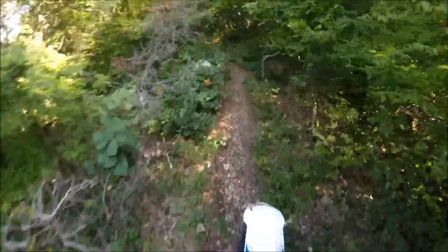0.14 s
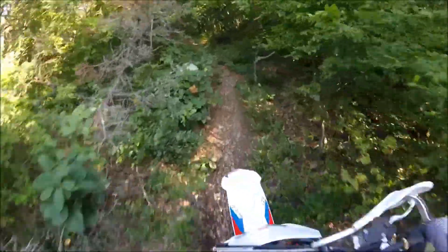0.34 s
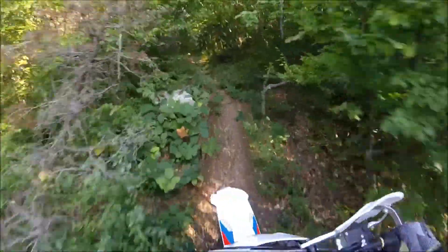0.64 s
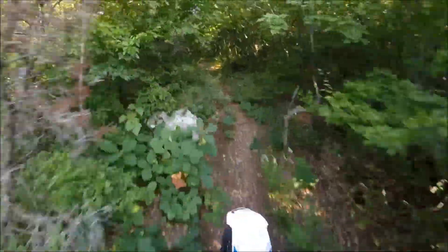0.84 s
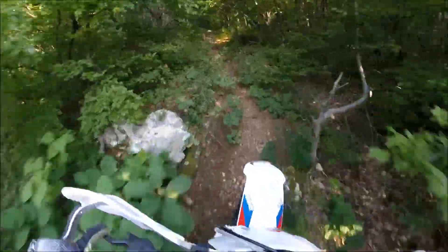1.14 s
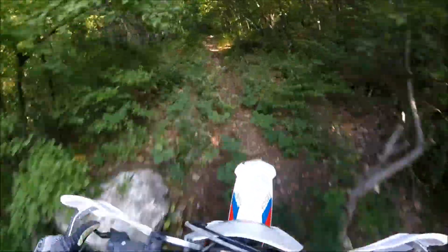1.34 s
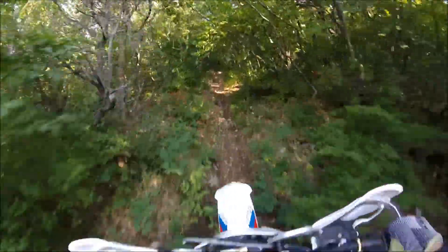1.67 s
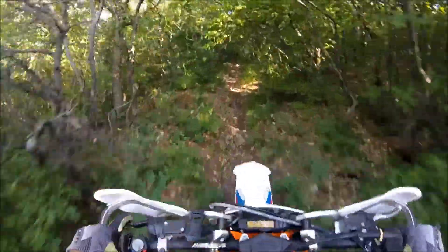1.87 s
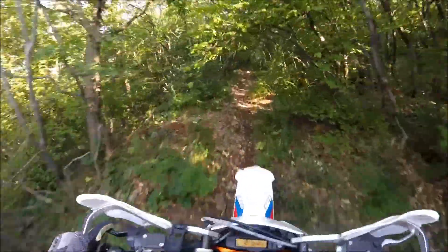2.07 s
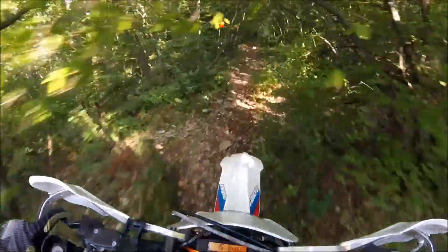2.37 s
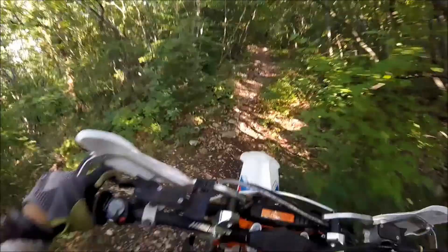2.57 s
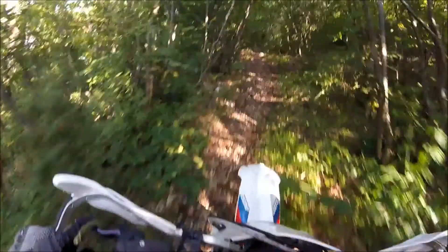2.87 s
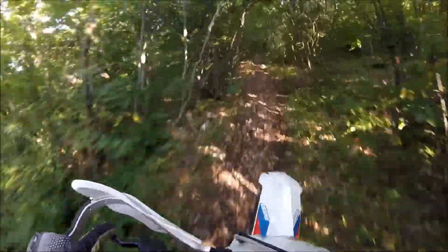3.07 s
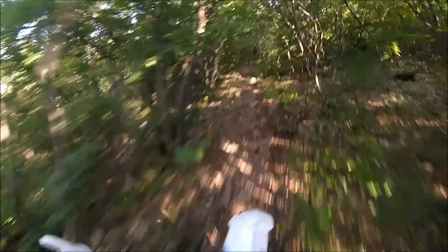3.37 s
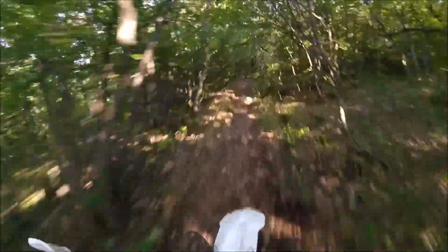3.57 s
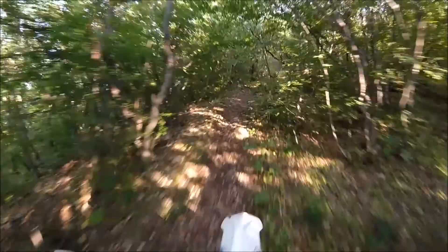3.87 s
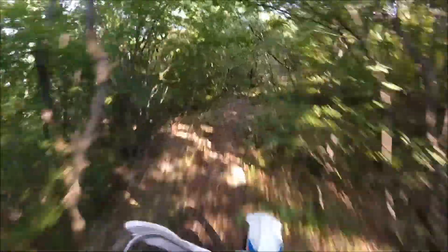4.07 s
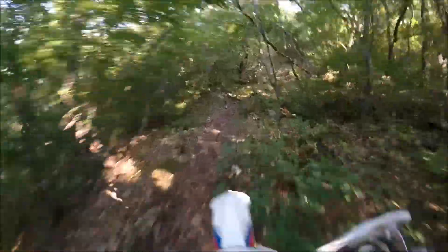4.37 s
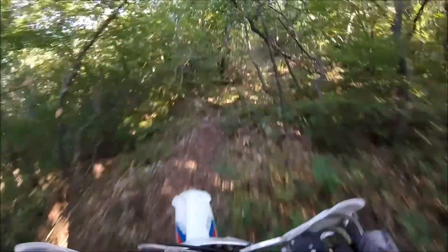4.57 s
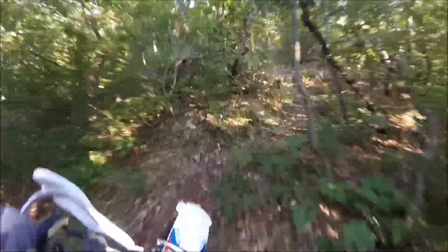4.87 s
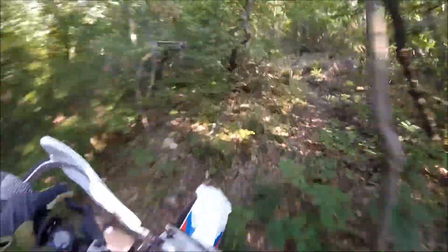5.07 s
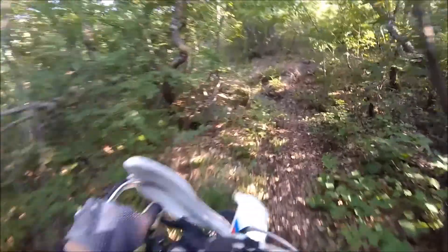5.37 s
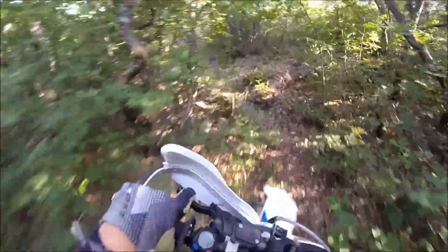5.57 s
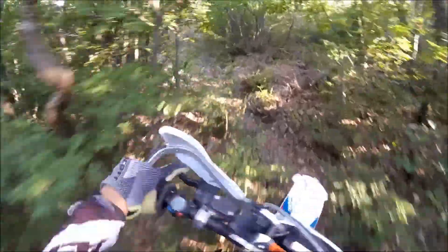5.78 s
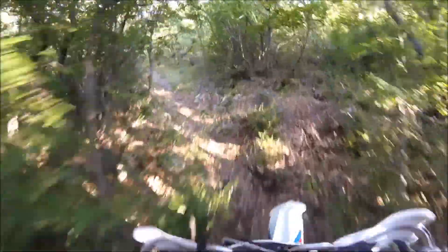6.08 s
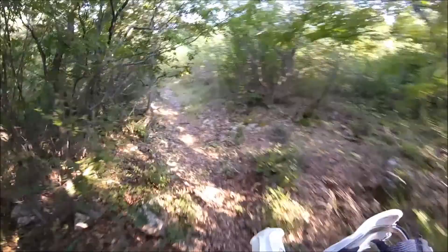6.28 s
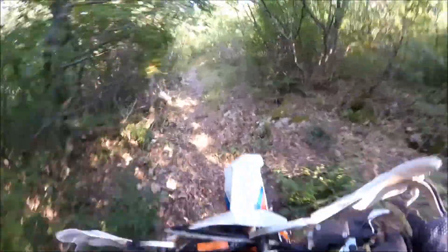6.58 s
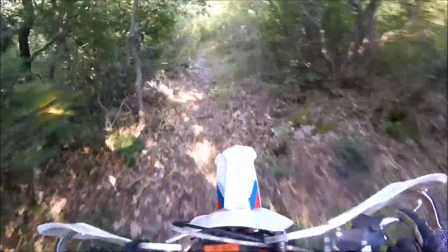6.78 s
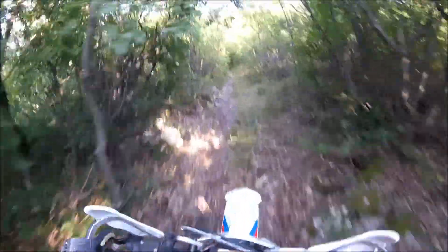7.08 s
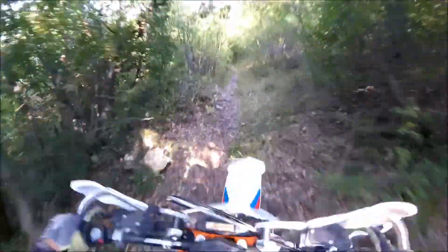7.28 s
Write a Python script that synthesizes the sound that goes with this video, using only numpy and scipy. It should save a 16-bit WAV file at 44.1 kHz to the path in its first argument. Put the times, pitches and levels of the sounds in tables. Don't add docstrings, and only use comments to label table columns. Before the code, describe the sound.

A two-stroke dirt bike buzzes along a forest trail, revving in bursts with throttle cuts and bangs, while twigs snap against the helmet.

```python
import sys
import numpy as np
from scipy import signal
from scipy.fft import rfft, irfft, next_fast_len
from scipy.io import wavfile
from scipy.ndimage import uniform_filter1d

SR = 44100
rng = np.random.default_rng(int(sys.argv[2]) if len(sys.argv) > 2 else 0)


def to_wav(sig):
    pcm = np.clip(np.atleast_2d(sig), -1, 1) * 32767
    pcm = np.round(pcm).astype(np.int16)
    wavfile.write(sys.argv[1], SR, pcm.T)


def makeup_ratio(level_db):
    decades = np.asarray(level_db, float) / 20
    return 10 ** decades


N = 327222
T = np.arange(N) / SR

# start_s, level_db
WIND_LEVEL = [(0.0, -28), (1.18, -31), (1.34, -55), (3.08, -48), (3.43, -52), (3.89, -36.5), (4.63, -41),
              (5.25, -32), (6.2, -40), (6.38, -29.5), (7.42, -30.5)]
# start_s, peak_db, pitch_hz
LOW_THUMPS = [
    (4.564, -10, 63),
    (4.826, -18, 29.7),
    (5.258, -12.5, 27.97),
]
# start_s, peak_db, length_s, ring_hz, thud_db
TWIG_HITS = [(1.111, -16, 0.013, 7100, -12), (1.135, -20, 0.029, 6500, -31), (2.004, -24, 0.016, 5900, -26),
             (2.6026, -25.5, 0.033, 5400, -22), (2.609, -10.5, 0.0087, 6600, -8),
             (2.66, -14, 0.013, 5070, -17), (2.678, -15, 0.0055, 5400, -26),
             (2.7022, -15, 0.005, 5590, -15.5), (2.714, -29, 0.0065, 5200, -16),
             (2.7485, -13, 0.0024, 2520, -40), (4.527, -7.5, 0.015, 5320, -17),
             (4.543, -29, 0.0044, 5040, -9), (4.55, -35, 0.028, 6500, -20),
             (4.562, -23.5, 0.012, 5370, -11), (4.57, -9.5, 0.0024, 2055, -22)]
# pitch_hz, level_db (per Hz)
TWIG_TONE = [(350, -29), (600, -5), (861, -24.5), (1060, -5.5), (1150, -7), (1640, -11.5), (2270, -5),
             (3140, -16.5), (5770, -16.5), (9030, -23), (11700, -56), (15200, -85), (22000, -120)]

# time_s, turns_per_s
GRIP_SPEED = [(0.0, 50), (.47, 42), (1.1, 47.8), (1.21, 54.3), (1.43, 55.8), (1.67, 72.6), (1.82, 77.4),
              (2.12, 52.2), (2.43, 55.0), (2.64, 64), (3.33, 75.2), (3.84, 68), (4.36, 59), (5.0, 45),
              (5.65, 40), (6.4, 41.5), (7.23, 34.2), (7.42, 41.7)]
# peak_s, extra_turns_per_s, rise_s, fall_s
WHEEL_FLARES = [(.16, 22, 0.14, .08), (.33, 16, .15, 0.13), (0.977, 16.5, 0.081, 0.061),
                (1.51, 3.5, 0.057, 0.077), (1.641, 2.0, 0.049, .1), (2.03, 8.5, 0.067, 0.088),
                (2.49, 3.5, 0.051, .13), (2.73, -8, 0.044, 0.044), (2.81, 13, 0.03, 0.064),
                (2.889, -7.5, 0.034, 0.073), (2.999, 6, 0.068, 0.055), (3.148, 10, 0.084, .18),
                (3.48, 54, .135, 0.12), (3.63, 50, .14, 0.24), (3.97, 29, .12, 0.19),
                (5.4, 5.5, 0.41, 0.22), (5.881, 3, .18, .2), (6.22, 1.0, 0.11, 0.096),
                (6.68, 6.5, 0.23, .08), (6.945, 8.5, .14, 0.14)]
# open_s, shut_s, opening_pipe_db, shutting_pipe_db
THROTTLE_TWISTS = [(0.0, 0.078, -17, -26), (0.112, 0.152, -12, -9.5), (0.227, 0.334, -21, -10.5),
                   (.37, .43, -24, -24), (0.476, .97, -19, -16.5), (1.083, 1.593, -12.5, -11.5),
                   (1.6, 1.808, -14, -15), (2.015, 2.075, -11, -13.5), (2.1, 2.462, -18.5, -12.5),
                   (2.479, 2.55, -9.5, -10.5), (2.586, 2.692, -18, -15.5), (2.78, 2.797, -13, -14.5),
                   (2.837, 2.95, -25, -13.5), (2.95, 3.38, -17, -13), (3.387, 3.467, -14, -7.5),
                   (3.47, 3.622, -10, -7.5), (3.654, 3.744, -12, -28.5), (3.905, 3.989, -17.5, -19),
                   (4.222, 4.38, -32.5, -39), (4.391, 4.582, -31, -22.5), (4.86, 4.957, -39.5, -32),
                   (5.067, 5.483, -28, -27), (5.644, 5.68, -26.5, -16), (5.7, 6.236, -18.5, -19.5),
                   (6.27, 6.332, -27, -27.5), (6.537, 6.687, -15.5, -18), (6.709, 6.98, -20.5, -17.5),
                   (7.022, 7.404, -21, -17.5)]
# start_s, end_s, unevenness (0-1), intake_gulp (share of the firing), whine_db (over hiss)
STEADY_RUNNING = [(0.066, 0.37, 0.15, 0.02, 0), (0.624, .9, 0.07, 0.4, 8.5), (.9, 1.107, 0.17, 0.25, 4),
                  (1.115, 1.36, 0.02, 0.11, 7.5), (1.33, 1.945, 0.04, 0.064, 5),
                  (1.997, 2.08, 0.15, 0.29, -29), (2.088, 2.463, 0.04, .5, 6), (2.49, 2.575, 0.1, 0.24, 8),
                  (2.606, 2.727, 0.08, .1, 2), (2.926, 3.7, 0.02, 0.066, 5), (3.873, 4.02, 0.12, 0.36, -14),
                  (4.011, 4.379, 0.04, 0.57, -6), (5.72, 6.266, 0.06, 0.45, 5.5),
                  (6.533, 6.721, 0.01, 0.26, 4), (6.765, 7.426, 0.06, 0.6, 8.5)]
# start_s, pipe_peak_db, spit_db (hiss)
LATE_BANGS = [(0.215, -10, -43), (0.396, -7, -31), (0.463, -5.5, -41), (0.505, -5.5, -29),
              (0.547, -2.5, -31), (0.641, -27, -39), (0.934, -4.5, -50), (1.067, -17, -68),
              (1.993, -3, -60), (2.861, -21, -40), (3.889, -4, -67.5), (4.401, -12, -30.5),
              (4.466, -9, -86), (4.646, -13.5, -45), (4.942, -16.5, -39), (5.094, -17, -33.5),
              (5.158, -9, -33), (5.222, -13, -35), (5.286, -13.5, -72), (5.329, -14, -32),
              (5.382, -21, -33), (5.425, -11, -34), (5.467, -14, -30), (5.695, 0.5, -55), (6.344, -14, -34),
              (6.452, -10, -33), (6.48, -12, -67), (6.532, -6, -52), (6.65, -14, -33), (6.746, -7, -65)]

# pitch_hz, width_hz, level_db
PIPE_RINGS = [(261.6, 85, 4), (162, 99, -8)]
# time_s, pitch_factor (ratio), upper_ring_hz, upper_ring_db
GAS_HEAT = [(0.0, 1.02, 454, -1.5), (.15, 0.885, 300, -5), (.55, 1.095, 466, -12.5), (1.1, 1.005, 444, -9),
            (1.42, 0.988, 504, -5), (1.5, 1.044, 319, -2), (1.8, 0.98, 380, -5.5), (2.42, 0.95, 388, -7.5),
            (2.5, .97, 428, -3), (3.25, 1.113, 470, -14), (3.42, 1.007, 406, -2.5), (3.9, 1.087, 334, -7.5),
            (4.12, 0.885, 380, -3), (5.6, 1.0, 324, -2.5), (5.76, 1.078, 373, -14.5),
            (6.25, 0.956, 403, -6), (6.5, 0.984, 342.6, -7), (7.42, .95, 350, -5)]
# pitch_hz, width_hz, level_db
AIRBOX_RINGS = [(512.7, 87, -12), (662, 126, -20.5), (884, 160, -23.5), (1325, 100, -29),
                (2082, 170, -31.5)]
# pitch_hz, level_db
FRAME_ONE_A_TURN = [(40, -32), (55, -32), (77, -27), (95, -25), (120, -26.5)]
# pitch_hz, level_db
FRAME_TWO_A_TURN = [(70, -22), (84, -23.5), (105, -29.5), (125, -27.5), (150, -25), (240, -51)]
# time_s, level_db
GROUND_RUSH = [(0.0, -39), (.43, -41), (.9, -37.5), (1.4, -37), (1.75, -35), (2.1, -37.5), (2.8, -40.5),
               (3.3, -39.5), (3.6, -41.5), (3.75, -42), (4.4, -40.5), (4.6, -46.5), (5.0, -43.5),
               (5.8, -37), (6.25, -37), (6.45, -39.5), (7.0, -33), (7.42, -34)]
# pitch_hz, level_db (per Hz)
HISS_TONE = [(1650, -5), (2800, -6.5), (3180, -13.5), (3820, -10.5), (4180, -15), (5220, -2.5), (6630, 1),
             (7520, -10), (8280, -10.5), (9500, -17.5), (10900, -27.5), (11700, -37.5), (15200, -65),
             (22000, -120)]
# pitch_hz, level_db (per Hz)
CLATTER_TONE = [(120, -20), (250, -15), (400, -14), (600, -18), (830, -22), (1150, -22), (1310, -19.5),
                (1500, -28), (2060, -28.5), (2600, -34.5), (4200, -43), (6000, -87)]

OPEN_DB_PER_S, SHUT_DB_PER_S, COAST_DB = 248, 320, -40
STUMBLE_UNEVEN, STUMBLE_GULP, STUMBLE_WHINE_DB = 0.28, 0.12, 2.5
STUMBLE_HUM_DB = -9
STUMBLE_CLATTER_DB, CLEAN_CLATTER_DB = 1.14, -0.5
CLEAN_OUTFLOW_DB, CLEAN_AIRBOX_DB = -9, -3 + 6
TEETH = 25.2


def evened(x):
    return x / np.sqrt(np.mean(x ** 2) + 1e-20)


def columns(rows):
    times, *cols = np.transpose(rows)
    return [np.interp(T, times, col) for col in cols]


def coloured(tone, shape=1):
    hz, level_db = np.transpose(tone)
    size = next_fast_len(N)
    bins_hz = np.fft.rfftfreq(size, 1 / SR)
    gain = evened(makeup_ratio(np.interp(np.log(bins_hz + 1), np.log(hz + 1), level_db)))
    return irfft(rfft(shape * rng.standard_normal(N), size) * gain, size)[:N]


def resonate(x, hz, width):
    turn = np.exp(2j * np.pi * np.cumsum(hz * np.ones(len(x))) / SR)
    r = np.exp(-np.pi * width / SR)
    smooth = signal.lfilter([(1 - r) ** 2], [1, -2 * r, r * r], x / turn)
    return 2 * (turn * smooth).real


def ring_bank(x, rings, pitch=1):
    total = np.zeros(N)
    for k, (hz, width, db) in enumerate(rings):
        total += (-1) ** k * makeup_ratio(db) * resonate(x, hz * pitch, width)
    return total


def ringing_noise(hz, width):
    return evened(resonate(rng.standard_normal(N), hz, width))


def fading(clicks, seconds):
    return signal.lfilter([1], [1, -np.exp(-1 / (seconds * SR))], clicks)


def spikes(times, sizes):
    at = np.clip(np.round(times * SR).astype(int), 0, N - 1)
    return np.bincount(at, sizes, N)


def wind():
    tone = [(8, -14), (18, 19.5), (35, 19.0), (60, 10.0), (120, 13.5), (300, -40)]
    rumble = makeup_ratio(columns(WIND_LEVEL)[0]) * coloured(tone)
    for s, db, hz in LOW_THUMPS:
        u = (T - s) * hz
        rumble -= makeup_ratio(db) * np.sin(2 * np.pi * u) * np.exp(-4.0 * u ** 2)
    return rumble


def twigs():
    shape, thud, ring = np.zeros((3, N))
    t = np.arange(3000) / SR
    for s, db, length, hz, thud_db in TWIG_HITS:
        at = round(s * SR)
        hit = slice(at, at + len(t))
        fall = np.exp(-t / max(length, 0.002)) * (1 - np.exp(-t / 0.0002))
        shape[hit] += makeup_ratio(db) * fall
        thud[hit] += makeup_ratio(thud_db) * fall
        ring[hit] += makeup_ratio(db) * resonate(fall * rng.standard_normal(len(t)), hz, 940)
    snaps = 0.58 + 0.17 * fading(rng.random(N) < 400 / SR, 0.0028)
    shell = coloured([(30, -34), (60, 8.5), (300, 4), (800, -1), (1600, -30.5)])
    knock = 0.64 * coloured(TWIG_TONE, shape * snaps) + 2.3 * ring + thud * shell
    return signal.lfilter(*signal.butter(3, 8200, fs=SR), knock)


def revs():
    speed = columns(GRIP_SPEED)[0]
    for s, extra, rise, fall in WHEEL_FLARES:
        speed = speed + np.interp(T, [s - rise, s, s + fall], [0, extra, 0])
    return uniform_filter1d(speed, size=round(0.03 * SR), mode="nearest")


def throttle():
    level_db = np.full(N, float(COAST_DB))
    for start, end, first_db, last_db in THROTTLE_TWISTS:
        held_db = np.interp(T, [start, end], [first_db, last_db])
        ramps_db = OPEN_DB_PER_S * np.maximum(start - T, 0) + SHUT_DB_PER_S * np.maximum(T - end, 0)
        level_db = np.maximum(level_db, held_db - ramps_db)
    return level_db


def running():
    state = np.outer([STUMBLE_UNEVEN, STUMBLE_GULP, STUMBLE_WHINE_DB], np.ones(N))
    for start, end, *values in STEADY_RUNNING:
        state[:, (T >= start) & (T <= end)] = np.c_[values]
    return uniform_filter1d(state, size=round(0.066 * SR), axis=1, mode="nearest")


def crank(speed):
    turns = np.cumsum(speed) / SR
    s = np.transpose(LATE_BANGS)[0]
    slip = np.unwrap(-np.interp(s, T, turns) % 1, period=1)
    slip_before = np.r_[slip[0], slip[:-1]]
    lead = np.minimum(np.diff(s, prepend=0) * 0.99, 0.12)
    times = np.ravel([s - lead, s], "F")
    return turns + np.interp(T, times, np.ravel([slip_before, slip], "F"))


def frame_hum(turns, speed, pipe_db, clean):
    shake_db = STUMBLE_HUM_DB * (1 - clean)
    first_db = shake_db + 0.12 * (pipe_db + 15.5) + np.interp(speed, *np.transpose(FRAME_ONE_A_TURN))
    second_db = shake_db + 0.062 * (pipe_db + 0.5) + np.interp(2 * speed, *np.transpose(FRAME_TWO_A_TURN))
    first = makeup_ratio(first_db) * np.cos(2 * np.pi * turns)
    second = makeup_ratio(second_db - 1.5) * np.cos(4 * np.pi * (turns - 0.28))
    return np.sqrt(2) * (first + second)


def moving_parts(fire_s, strength, speed, pipe_db, clean, whine_db):
    bang_s, _, spit_db = np.transpose(LATE_BANGS)
    puff = uniform_filter1d(fading(spikes(fire_s - 0.005, strength), 0.011), size=60)
    spit = uniform_filter1d(fading(spikes(bang_s - 0.005, makeup_ratio(spit_db)), 0.0062), size=60)
    pulse = 0.5 + puff
    fast_db = 5 * np.log2(np.maximum(speed / 70, 1))
    hiss_db = columns(GROUND_RUSH)[0] + 0.13 * (pipe_db + 23.0) + fast_db
    hiss = coloured(HISS_TONE, makeup_ratio(hiss_db) * pulse + 0.9 * spit)
    fins = makeup_ratio(hiss_db - 10.0) * pulse * ringing_noise(6605, 200)

    clatter_db = STUMBLE_CLATTER_DB + (CLEAN_CLATTER_DB - STUMBLE_CLATTER_DB) * clean
    clatter_db = hiss_db + 0.15 * (pipe_db + 23.0) + clatter_db + 5.5
    clatter = coloured(CLATTER_TONE, makeup_ratio(clatter_db) * (1.03 + 0.5 * puff) + 0.3 * spit)

    gear_hz = TEETH * speed
    cover_db = -13 * abs(np.log2(gear_hz / 1350))
    whine = makeup_ratio(hiss_db + whine_db + cover_db - 4.5) * pulse * ringing_noise(gear_hz, 80)

    rasp_db = hiss_db + 0.5 - 24 * abs(np.log2(speed / 86.3)) + 0.3 * (pipe_db + 13.5)
    rasp = makeup_ratio(rasp_db) * pulse * ringing_noise(1990, 690)
    return hiss + fins + clatter + whine + rasp


def exhaust_pipe(drive, outflow):
    pitch, upper_hz, upper_db = columns(GAS_HEAT)
    swelled = 0.45 * drive + 0.7 * np.r_[np.zeros(165), drive[:-165]]
    upper = makeup_ratio(upper_db) * resonate(drive + outflow, upper_hz, 116)
    return ring_bank(swelled + outflow, PIPE_RINGS, pitch) - upper


def airbox(drive, bangs, outflow, speed, clean):
    breath = drive - 0.4 * bangs + 1.2 * outflow
    level_db = CLEAN_AIRBOX_DB * clean + np.log2(speed / 55)
    return makeup_ratio(level_db) * ring_bank(breath, AIRBOX_RINGS)


def engine():
    speed, pipe_db = revs(), throttle()
    uneven, gulp, whine_db = running()
    clean = np.clip(1 - uneven / STUMBLE_UNEVEN, 0, 1)
    turns = crank(speed)
    fire = np.flatnonzero(np.diff(np.floor(turns)) > 0)
    luck = rng.standard_normal((len(fire), 2))
    strength = makeup_ratio(uneven[fire] * (9 * luck[:, 0] - 4))
    when = T[fire] + 0.002 * uneven[fire] * luck[:, 1]
    size = strength * makeup_ratio(pipe_db[fire]) * np.sqrt(55 / speed[fire])
    gulps = spikes(when + 0.49 / speed[fire], gulp[fire] * size)
    firings = spikes(when, size) + gulps
    bang_s, bang_db, _ = np.transpose(LATE_BANGS)
    bangs = makeup_ratio(34.0) * spikes(bang_s, makeup_ratio(bang_db))
    drive = makeup_ratio(47.5) * firings + bangs
    outflow = makeup_ratio(9 + CLEAN_OUTFLOW_DB * clean) * fading(firings, 0.006) * rng.standard_normal(N)
    hum = frame_hum(turns, speed, pipe_db, clean)
    noises = moving_parts(T[fire], strength, speed, pipe_db, clean, whine_db)
    box = airbox(drive, bangs, outflow, speed, clean)
    return hum + noises + box + exhaust_pipe(drive, outflow)


def scene():
    return (wind() + twigs() + engine())[None]


def band_limit(x):
    return signal.sosfilt(signal.butter(12, 11870, fs=SR, output="sos"), x)


def record(dry):
    soft = 0.92 * np.tanh(dry / 0.81)
    band = signal.oaconvolve(soft, signal.firwin(127, 11600, fs=SR)[None], "same")
    return band_limit(band)


dry = scene()
out = record(dry)
to_wav(out)
```